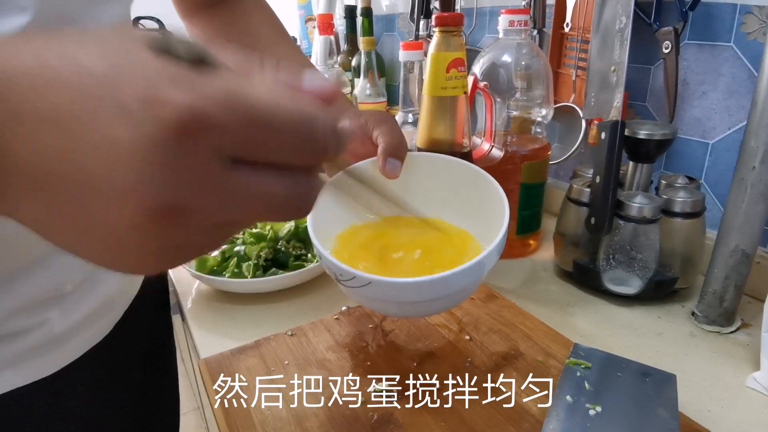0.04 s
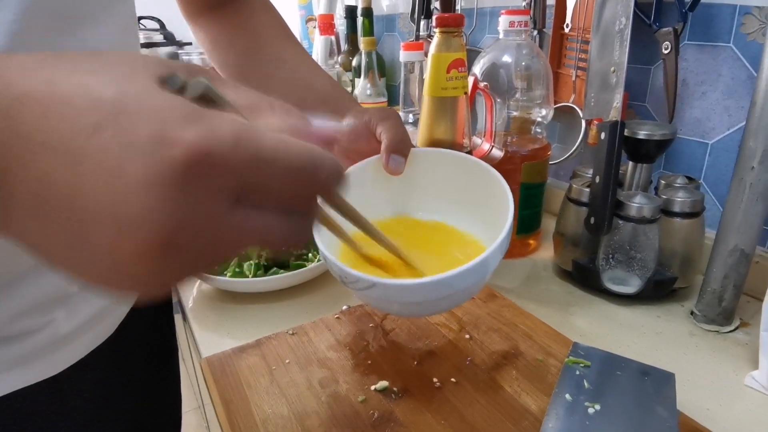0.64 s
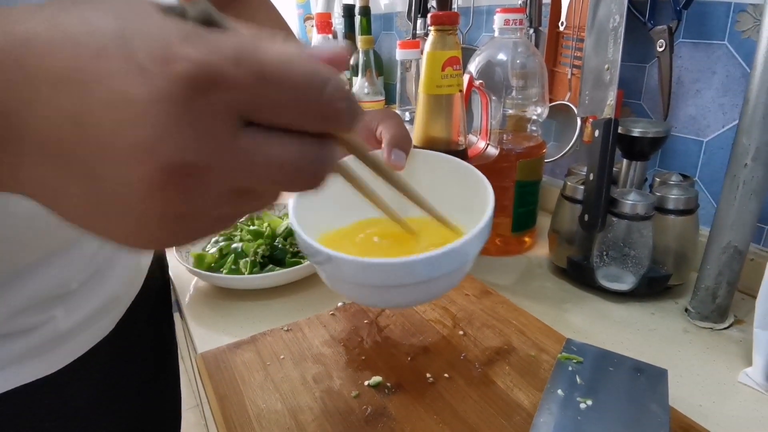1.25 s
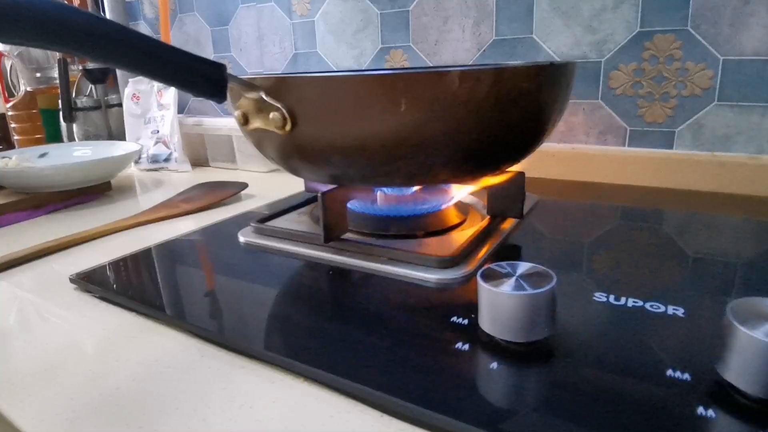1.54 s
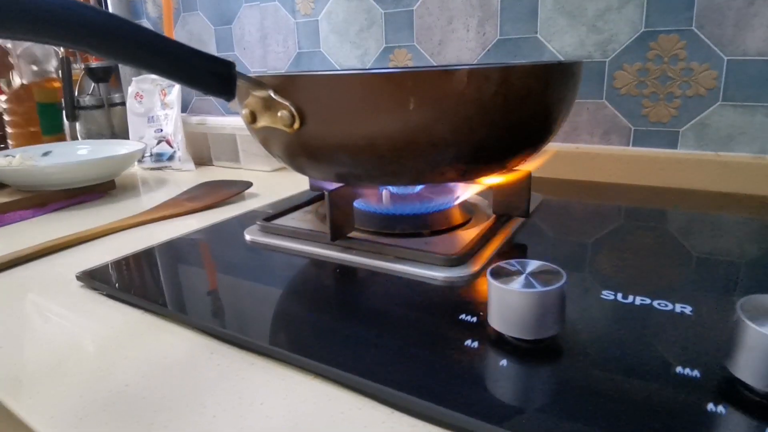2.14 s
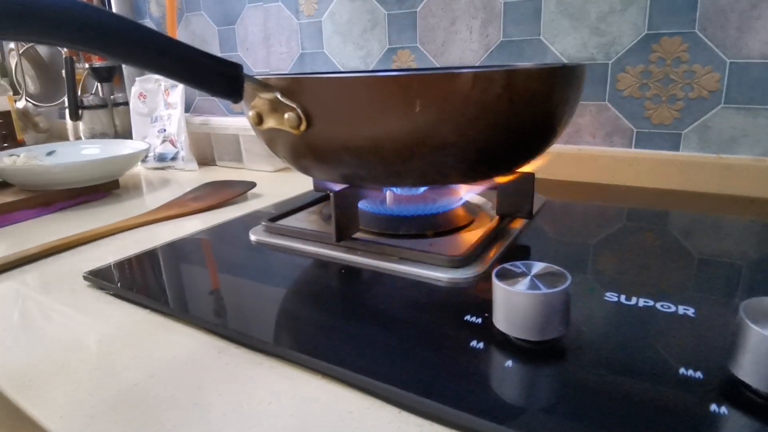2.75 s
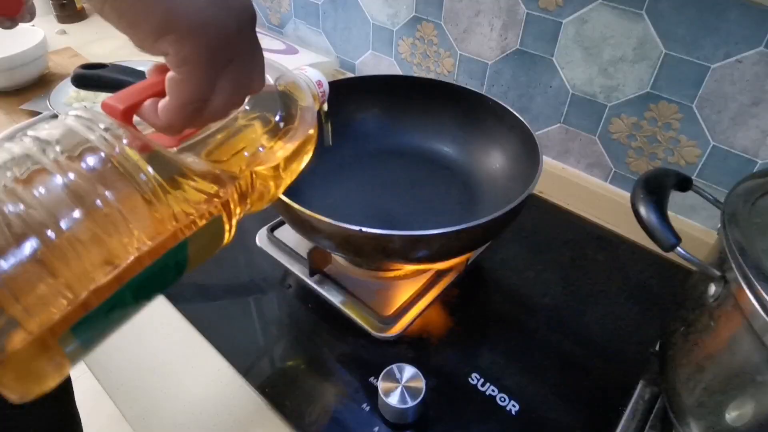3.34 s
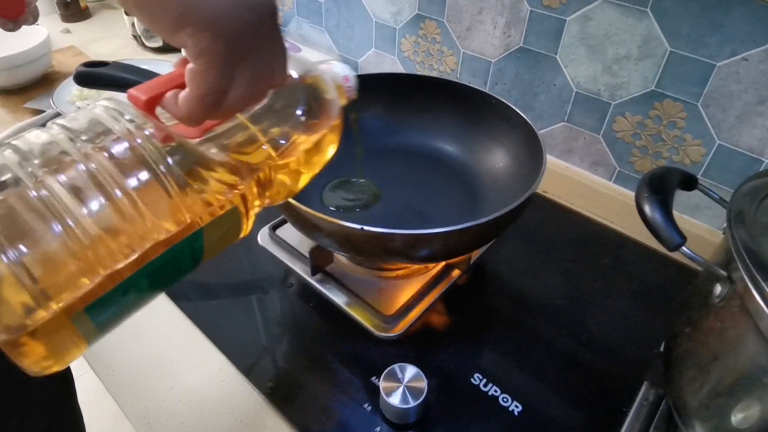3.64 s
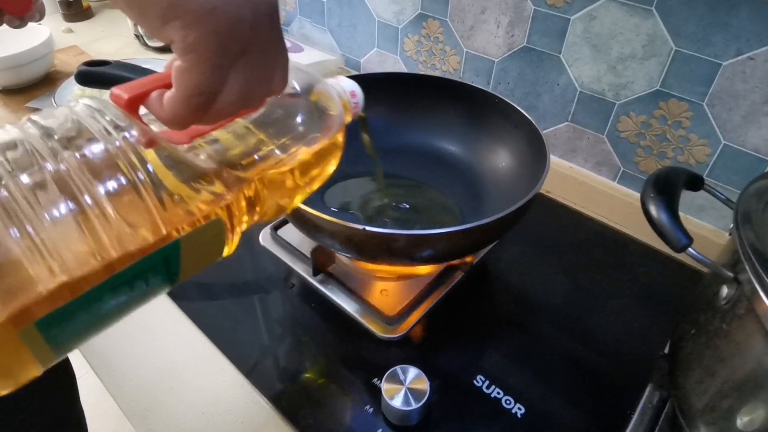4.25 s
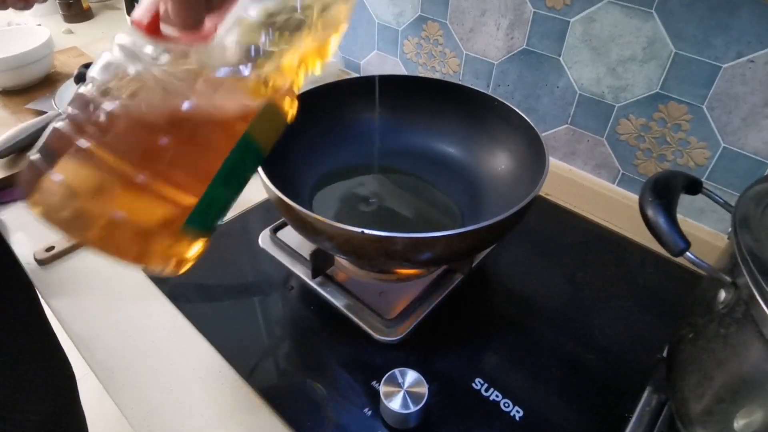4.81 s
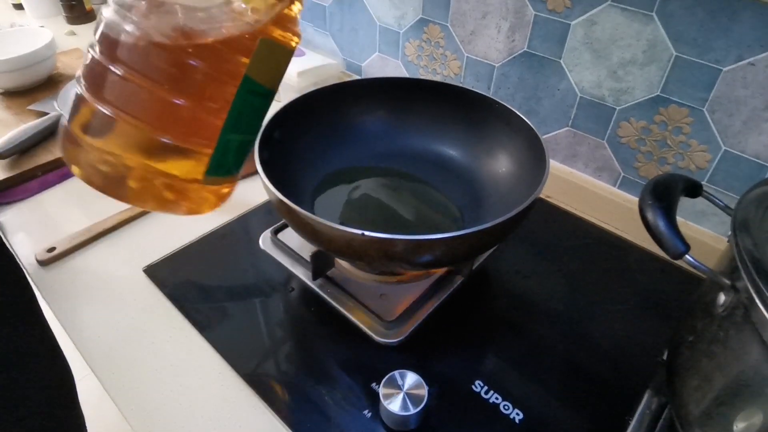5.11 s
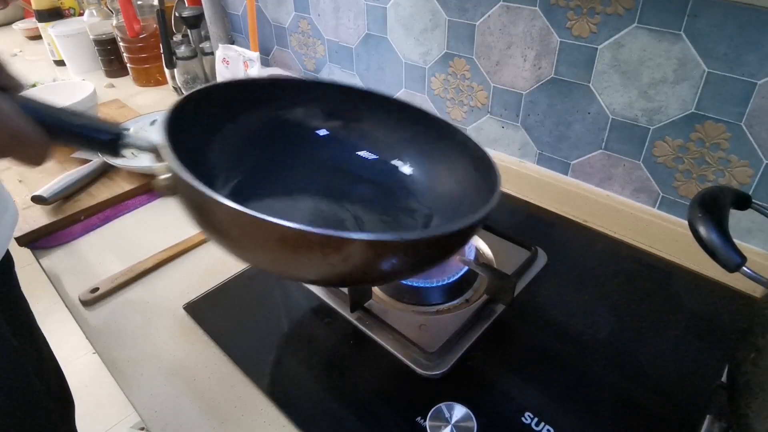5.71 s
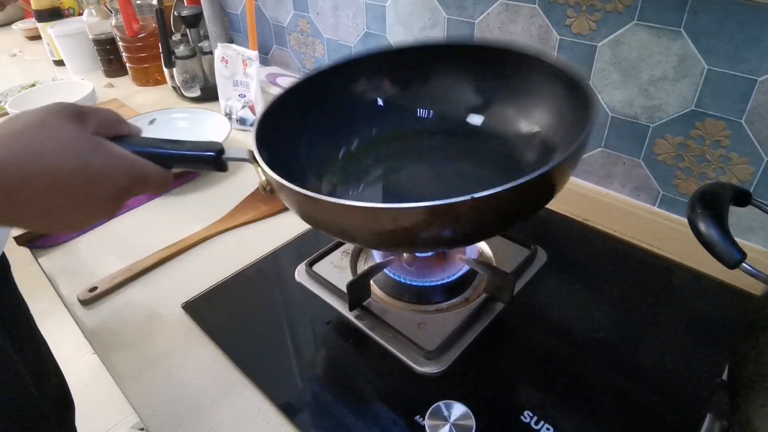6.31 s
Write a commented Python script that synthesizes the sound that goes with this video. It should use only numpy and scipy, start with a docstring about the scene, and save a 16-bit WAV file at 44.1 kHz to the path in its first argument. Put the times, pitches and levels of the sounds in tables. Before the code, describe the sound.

Rapid clacking and wet whisking in a bowl give way to a hissing gas flame, crackling plastic, small glugs and a light pan scrape.

```python
"""First, chopsticks beat raw eggs in a ceramic bowl in a small kitchen, six strokes a second:
wood clacks on the glaze, air pockets pop and the egg swishes. After a short silence a gas burner
hisses and rumbles under a wok. A plastic oil bottle crinkles as it is squeezed, with a soft, low
bump early on, and glugs near 5 s as air gulps back in. Last, the steel wok scrapes and rings
as it is lifted, and the uncovered flame hisses on."""
import sys
import numpy as np
from scipy import signal
from scipy.fft import rfft, irfft
from scipy.io import wavfile
from scipy.ndimage import uniform_filter1d

SR = 44100
rng = np.random.default_rng(int(sys.argv[2]) if len(sys.argv) > 2 else 0)


def generate_wav(signal):
    """Clip the signal to [-1, 1] and save it as 16-bit WAV at the path in sys.argv[1]."""
    frames = np.transpose(np.atleast_2d(signal))
    scaled = np.clip(frames, -1, 1) * 32767
    pcm = np.round(scaled).astype(np.int16)
    wavfile.write(sys.argv[1], SR, pcm)


N = 285327
TIME, FREQS = np.arange(N) / SR, np.fft.rfftfreq(N, 1 / SR)

# Table levels are relative. "Pan" is left minus right; "tilt" adds treble; "colour" is tone balance.
# sticks hit the bowl: (time [s], level [dB], main pitch [Hz], pan [dB], decay [s], tilt [dB/octave])
CLACKS = [(0.1467, -14.5, 2010, 0.5, 0.0021, 2.5), (0.3145, -16, 2760, -1, 0.0033, -2),
          (.4750, -16.5, 2980, 1, 0.002, 2.5), (0.6426, -17, 3000, -0.5, 0.003, 2),
          (0.8055, -25, 2720, 2.5, 0.0024, 7.5), (.9812, -14, 2130, 0.5, 0.002, 2),
          (1.1458, -29, 4600, -5, 0.0077, 15.5), (1.3221, -16.5, 2100, -0.5, 0.0017, -3.5),
          (1.3694, -20.5, 3450, -4.5, 0.0019, 5.5), (1.4641, -27.5, 2170, 1, 0.0013, -1.5),
          (1.4867, -20, 4650, -1, 0.0026, -23)]
# the dry knock of wood on glaze: (frequency [Hz], level [dB])
KNOCK_COLOUR = [(150, -41), (450, -31.5), (800, -9), (1300, -26.5), (2100, 4.5), (3000, 3), (3800, 2),
                (5200, 0), (6000, -8), (7000, -6), (9000, -22), (11000, -18), (16000, -52)]
# the bowl's notes, damped by fingers and egg: (pitch [Hz], level [dB], time to fade 60 dB [s])
BOWL_NOTES = [(861, -11.5, .26), (2035, -5.5, 0.179), (2180, -7, .22), (2440, -8.5, .25), (2600, -5, 0.2),
              (2870, -6.5, .28), (3050, -3, .22), (3400, -6, 0.21), (4170, -11.5, 0.19), (4980, -13, .2),
              (5170, -13, .22)]
# the dull knock of the bowl's belly: (frequency [Hz], level [dB])
BELLY_COLOUR = [(200, -29.5), (620, -17), (860, 0.5), (1100, -7), (1700, -10), (2600, -23.5), (8000, -60)]
# large air pockets open in the egg: (time [s], level [dB], pitch [Hz], decay [s], pan [dB])
POPS = [(.0545, -37.5, 8520, .003, 6), (0.1242, -32.5, 3850, .0015, 1), (.1278, -31, 1614, 0.0069, 0.5),
        (.1385, -25, 1948, 0.006, -4.5), (0.1484, -24, 2870, 0.0027, -0.5), (0.2949, -32, 4420, 0.0029, 0),
        (0.3156, -27.5, 2436, .0061, 5), (0.625, -39, 4420, .0051, 4), (.646, -32, 2796, 0.0073, 0),
        (.807, -41, 1087, .009, -2.5), (.8365, -35.5, 2904, 0.0049, 0), (0.9354, -26.5, 4360, 0.0013, 5),
        (.9825, -32.5, 2067, .0065, 5), (1.3023, -25, 2340, 0.0038, 3), (1.3213, -27, 2036, 0.0052, -3),
        (1.377, -48, 1022, .018, 0.5), (1.539, -45, 1200, 0.0088, 2)]
# the sticks sweep through the egg: (time of fastest sweep [s], level [dB], decay [s])
STROKES = [(0.0, -35.5, 0.048), (0.14, -47.5, 0.081), (0.499, -48, 0.033), (0.634, -47, 0.018),
           (0.822, -48, 0.045), (0.995, -59, .045), (1.165, -46, 0.037), (1.344, -52, 0.052),
           (1.5, -53, 0.093)]
# the egg's wet swish: (frequency [Hz], level [dB])
SWISH_COLOUR = [(200, -18.5), (500, -13), (1100, 8), (1600, 3), (2200, 10), (3000, 5), (5000, 4),
                (6000, -3.5), (8000, -2), (9000, -11.5), (11000, -11), (16000, -34)]
# the hand tightens on the bottle: (time [s], level [dB], decay [s], tilt [dB/octave])
SQUEEZES = [(1.904, -45, .028, 2), (2.01, -46, .014, 0), (2.071, -40.5, 0.022, 1.5),
            (2.32, -48.5, 0.028, 0.5), (2.904, -40.5, 0.025, 0), (3.06, -39, 0.024, 0.5),
            (3.181, -44.5, 0.015, 0), (3.562, -43.5, 0.02, -0.5), (3.608, -40, 0.013, 5.5),
            (3.763, -48.5, 0.027, -0.5), (4.08, -45.5, 0.011, 2.5), (4.355, -47, 0.058, 1.5),
            (4.619, -49.5, 0.023, -1), (4.686, -47, .022, 4.5), (5.276, -47.5, 0.038, 2)]
# the plastic wall buckles: (time [s], level [dB], decay [s], tilt [dB/octave])
SNAPS = [(1.995, -35, 0.007, 3.5), (2.117, -35, .005, 6), (2.142, -33.5, 0.0056, -1),
         (2.537, -36.5, 0.0046, -0.5), (2.5677, -31.5, 0.0042, 0.5), (2.5888, -29, 0.004, 1.5),
         (2.6393, -25.5, 0.0044, 3), (2.7276, -29, 0.0028, 6), (2.932, -28.5, 0.0077, -.5),
         (3.4464, -32.5, 0.0075, -1), (3.5382, -28, 0.0057, 2), (3.5991, -17, 0.0042, 4.5),
         (4.1256, -23, 0.0028, 4.5), (4.7842, -32.5, 0.0047, 7), (4.9242, -33, 0.0039, 3),
         (5.1414, -33.5, 0.0042, 2.5)]
# the crackle of thin plastic: (frequency [Hz], level [dB])
PLASTIC_COLOUR = [(150, -20), (500, -2.5), (1000, 5), (1500, 1), (2000, 3.5), (3200, -1), (4400, 4),
                  (5800, -1.5), (7500, -3), (9000, -6.5), (11000, -3.5), (13500, -12.5), (16000, -18)]
# pitches the bottle's shell favours: (pitch [Hz], width [Hz], boost [dB])
SHELL_PEAKS = [(1110, 85, 2), (1940, 64, 1.5), (2500, 430, 3), (4270, 200, -1.5), (5100, 150, 3.5),
               (7450, 290, 3)]
# air gulps into the bottle: (time [s], level [dB], pitch [Hz], decay [s], rise [octaves], pan [dB])
GLUGS = [(5.0174, -25, 2420, 0.00088, 0, -0.5), (5.0178, -42, 3000, 0.0042, 0.088, -2),
         (5.0175, -42.5, 794, 0.0061, 0.0084, 6.5), (5.092, -44.5, 1260, .012, 0.057, 7),
         (5.1765, -35, 737, 0.0084, 0.043, 1)]
# a soft, low bump: (time [s], level [dB], pitch [Hz], decay [s], rise [octaves], pan [dB])
BUMP = [(2.006, -51, 191, 0.0099, 0.12, 1), (2.008, -48.5, 268, 0.048, -0.079, -3),
        (2.01, -57, 545, 0.031, 0.021, 0), (2.085, -50.5, 199, 0.013, -0.86, -3)]
# the steel wok's notes: (pitch [Hz], level [dB], time to fade 60 dB [s])
WOK_NOTES = [(1832, 0, 0.29), (2180, -5, .18), (2720, -4, 0.16), (3650, -14, 0.16), (4800, -20, .22)]
# the flame under the wok: (frequency [Hz], level [dB])
COVERED_FLAME = [(12, -36), (20, -7.5), (48, 2), (62, -3), (85, -4), (130, -2), (357, -16), (434, -8),
                 (513, -18.5), (660, -10), (802, -11), (949, -9.5), (5850, -22.5), (6540, -2),
                 (7310, -28.5), (16000, -47)]
# the flame with the wok lifted: (frequency [Hz], level [dB])
OPEN_FLAME = [(12, -29), (20, -3.5), (49, -4.5), (150, -10.5), (388, -18), (1150, -17.5), (1260, -22.5),
              (1810, -16), (2020, -24), (2530, -27), (3950, -26), (6540, -20.5), (8650, -38),
              (13200, -36.5), (16000, -67)]
# hums and whistles of burner and wok: (pitch [Hz], width [Hz], level covered [dB], level open [dB])
JET_PEAKS = [(52, 5, -76, -63.5), (131.6, 7.8, -66.5, -74), (1840, 28, -86, -72.5), (2523, 130, -86, -71),
             (6516, 93, -75, -64), (6690, 300, -71.5, -64), (12470, 1600, -77, -74)]
# the whistle swells for a moment: (time [s], boost [dB])
WHISTLE_SWELLS = [(5.595, 0), (6.25, 8.5)]
# the flame rumbles more once the air is stirred: (time [s], level [dB])
RUMBLE_LEVEL = [(1.9, -66.5), (3.5, -67), (3.8, -59.5), (4.0, -54.5), (4.25, -57.5), (5.3, -57.5),
                (6.47, -60)]
# the deep tone of that rumble: (frequency [Hz], level [dB])
RUMBLE_COLOUR = [(20, -11.5), (48, 4), (62, -12), (85, -3.5), (130, 0.5), (200, -8), (400, -11),
                 (1000, -67)]
# the kitchen's steady background: (frequency [Hz], level [dB])
KITCHEN_COLOUR = [(20, -3.5), (50, -0.5), (62, -4.5), (85, 3.5), (110, -4), (128, 8), (160, -8.5),
                  (230, -12.5), (350, -11), (500, -17.5), (900, -18.5), (2000, -37.5), (8000, -36),
                  (16000, -56)]
# the echo from the walls: (frequency [Hz], time to fade 60 dB [s])
ECHO_TIMES = [(200, 0.49), (1300, 0.2), (3500, 0.38), (9000, 0.36), (16000, 0.18)]
# how alike left and right are for sound from all around: (frequency [Hz], likeness [0 to 1])
LIKENESS = [(60, 0.85), (300, 0.82), (700, 0.66), (1400, 0.067), (3000, 0), (16000, 0.0012)]
# the side each frequency leans to: (frequency [Hz], pan [dB])
SIDE_COLOUR = [(60, 4.5), (200, 1), (400, 0), (2000, 0.5), (3000, 0), (4500, -3.5), (6500, -6),
               (8300, -10.5), (9500, 11.5), (11500, 6), (13000, 4.5), (15500, 4.5)]
# a silence, then two brief dips in level:
# (fade-out end [s], fade-out length [s], fade-in start [s], fade-in length [s], lowest gain [0 to 1])
DIPS = [(1.612, .062, 1.8995, .0025, 0), (3.497, .042, 3.512, .038, .06), (5.396, .046, 5.424, .046, .025)]


def chopsticks(first_db=-7, second_db=-12, gap_s=.003, ring_db=-27, hollow_db=6, hollow_octaves=.27):
    """One stick hits the glaze just after the other; the hollow bowl colours the knock and rings."""
    out = np.zeros((2, N))
    for start, db, peak_hz, pan_db, decay, tilt_db in CLACKS:
        def tone(hz):
            octaves = np.log2((hz + 1) / peak_hz)
            egg_db = ripple(hz, depth_db=2, width_hz=300)
            boost_db = hollow_db * np.exp(-(octaves / hollow_octaves) ** 2)
            return read(KNOCK_COLOUR, hz) + egg_db + boost_db + tilt_db * np.maximum(octaves, 0)
        for delay, stick_db in (0, first_db), (gap_s * (.5 + rng.random()), second_db):
            contact = nearby(rng.standard_normal((2, 4096)), shared=.27)
            knock = burst(contact, decay, rise_s=.00074, tone=tone)
            add(out, start + delay, amp(db + stick_db) * knock, pan_db)
        # the moving egg shifts the bowl's notes a little at every hit
        shifts = np.exp(.012 * rng.standard_normal(len(BOWL_NOTES)))
        notes = [(hz * shift, level, fade) for (hz, level, fade), shift in zip(BOWL_NOTES, shifts)]
        add(out, start, amp(db + ring_db) * ring(notes), pan_db)
    return out


def bowl_belly(level_db=-43, decay_s=.0033):
    """Each hit also pushes the filled bowl, which gives a short, low knock of even strength."""
    out = np.zeros((2, N))
    for start, _, _, pan_db, _, _ in CLACKS:
        push = nearby(rng.standard_normal((2, 4096)), shared=.73)
        knock = burst(push, decay_s, rise_s=.0013, tone=lambda hz: read(BELLY_COLOUR, hz))
        add(out, start, amp(level_db) * knock, pan_db)
    return out


def air_pockets(small_db=-49, scatter_s=.045, low_hz=1150, high_hz=4300, cycles=12, rise_octaves=.14):
    """Large pockets pop one by one; each stroke also frees two small ones, which ring longer if low."""
    pops = [(start, db, hz, decay, rise_octaves, pan_db) for start, db, hz, decay, pan_db in POPS]
    for start, _, _ in STROKES:
        for _ in range(2):
            offset = rng.uniform(-scatter_s, scatter_s)
            hz = low_hz * (high_hz / low_hz) ** rng.random()
            pops.append((start + offset, small_db, hz, cycles / hz, rise_octaves, 0))
    return blips(pops, roughness=.29)


def egg_swish(level_db=-2, patchy_db=4, stirring_db=-68, rise_s=.026):
    """Films of egg tear into a fine, wet crackle, coloured by hollows that open and close."""
    crackle = nearby(grains(7000, spread_db=2.6, size=N), shared=.6)
    _, _, bands = signal.stft(crackle, SR, nperseg=512, noverlap=384)
    hollows = uniform_filter1d(rng.standard_normal(bands.shape[1:]), size=4, axis=0)  # smooth in pitch
    hollows = unit(uniform_filter1d(hollows, size=6, axis=1))  # and in time
    wet = signal.istft(bands * amp(patchy_db * hollows), SR, nperseg=512, noverlap=384)[1][:, :N]
    sweep = amp(stirring_db) + sum(amp(db) * swell(peak, rise_s, decay) for peak, db, decay in STROKES)
    return amp(level_db) * sweep * colour(unit(wet), lambda hz: read(SWISH_COLOUR, hz))


def bottle(snap_db=-8, rustle_db=-1.5, squeeze_rise_s=.0063):
    """Thin plastic crackles under each squeeze, and now and then buckles with one sharp snap."""
    out = np.zeros((2, N))
    crackle = grains(6000, spread_db=2.4, size=N)
    for peak, db, decay, tilt_db in SQUEEZES:
        rustle = crackle * swell(peak, squeeze_rise_s, decay)
        out += amp(db + rustle_db) * colour(rustle, lambda hz: bottle_wall(hz, tilt_db))
    for start, db, decay, tilt_db in SNAPS:
        buckle = grains(6000, spread_db=2.6, size=4096)
        snap = burst(buckle, decay, rise_s=.00034, tone=lambda hz: bottle_wall(hz, tilt_db))
        add(out, start, amp(db + snap_db) * snap)
    return out


def bottle_wall(hz, tilt_db):
    """The colour of one patch of wall, in dB: plastic, the shell's peaks and some chance ripple."""
    shell_db = sum(boost_db * hump(hz, pitch, width) for pitch, width, boost_db in SHELL_PEAKS)
    return plastic(hz, tilt_db) + shell_db + ripple(hz, depth_db=2.5, width_hz=260)


def plastic(hz, tilt_db):
    """The colour of thin plastic, in dB, tilted brighter or duller."""
    return read(PLASTIC_COLOUR, hz) + tilt_db * np.log2(np.maximum(hz, 500) / 4000)


def creases(per_s=22, level_db=-57, spread_db=3, start_s=1.9, stop_s=5.35):
    """The gripped bottle keeps ticking faintly between the larger crinkles."""
    out, span = np.zeros((2, N)), stop_s - start_s
    for when, softness, length in rng.random((int(per_s * span), 3)):
        gain = amp(level_db - spread_db * np.log(.05 + softness))
        crackle = grains(4000, spread_db=1.5, size=2048)
        decay = .00048 + .0041 * length
        tick = burst(crackle, decay, rise_s=.00056, tone=lambda hz: plastic(hz, tilt_db=2.5))
        add(out, start_s + when * span, gain * tick)
    return out


def glugs():
    """Air gulps back into the bottle and its wall pops."""
    return blips(GLUGS, roughness=.37)


def bump():
    """A few low, rough notes blur into a soft bump."""
    return blips(BUMP, roughness=.74)


def wok(start_s=5.4675, ring_db=-40, scrape_db=-49, scrape_decay_s=.053):
    """The steel pan scrapes off its stand and rings, its pitch sagging a little as it tilts."""
    def steel(hz):
        power = sum(10 ** (db / 10) * hump(hz, pitch, width_hz=180) for pitch, db, _ in WOK_NOTES)
        return 10 * np.log10(power)
    out = np.zeros((2, N))
    add(out, start_s, amp(ring_db) * ring(WOK_NOTES, sag=.0447))
    scrape = burst(grains(4000, spread_db=1.7, size=11000), scrape_decay_s, rise_s=.003, tone=steel)
    add(out, start_s - .02, amp(scrape_db) * scrape)
    return out


def burner(flame_db=-56, fizz_db=-63, lift_s=5.41, swell_s=.031, whistle_above_hz=6000):
    """Gas rushes through the jet with a wavering whistle; the flame rumbles, and fizzes while covered."""
    lifted = TIME > lift_s
    fizz_gain = amp(fizz_db) * waver(depth_db=1.5, per_s=18)
    fizz = colour(grains(3000, spread_db=.92, size=N), lambda hz: read(PLASTIC_COLOUR, hz))
    covered = amp(flame_db) * noise(amp(read(COVERED_FLAME, FREQS))) + fizz_gain * fizz
    uncovered = amp(flame_db) * noise(amp(read(OPEN_FLAME, FREQS)))
    out = np.where(lifted, uncovered, covered)
    swell_db = sum(db * swell(peak, swell_s, swell_s) for peak, db in WHISTLE_SWELLS)
    whistle = waver(depth_db=2.5, per_s=12) * amp(swell_db)
    for hz, width, covered_db, open_db in JET_PEAKS:
        gain = amp(np.where(lifted, open_db, covered_db)) * (whistle if hz > whistle_above_hz else 1)
        out += gain * noise(hump(FREQS, hz, width))
    rumble_db = np.interp(TIME, *np.transpose(RUMBLE_LEVEL))
    return out + amp(rumble_db) * noise(amp(read(RUMBLE_COLOUR, FREQS)))


def kitchen_hum(level_db=-52.5):
    """The kitchen's faint, steady, low noise."""
    return amp(level_db) * noise(amp(read(KITCHEN_COLOUR, FREQS)))


def room(sound, echo_db, build_s=.0019, patterns=3):
    """Close walls add dense echoes that die band by band; patterns alternate so no pitch rings steadily."""
    out = sound.copy()
    for k in range(patterns):
        echoes = rng.standard_normal((2, SR // 2)) * (rng.random((2, SR // 2)) < .15)
        hz, t, bands = signal.stft(echoes, SR, nperseg=256)
        bands = blend_sides(bands, read(LIKENESS, hz)[:, None])
        fade = amp(-60 * t / read(ECHO_TIMES, hz)[:, None])
        tail = signal.istft(bands * fade, SR, nperseg=256)[1]
        tail *= 1 - np.exp(-(np.arange(tail.shape[1]) / SR / build_s) ** 2)
        tail /= np.linalg.norm(tail[0])
        share = np.sqrt(2 / patterns) * np.cos(2 * np.pi * (TIME + k / patterns))  # one cycle a second
        out += amp(echo_db) * signal.oaconvolve(sound * share, tail, axes=1)[:, :N]
    return out


def blips(rows, roughness, splash_db=-12, wobble_cycles=3, left_lag_s=.00002, glide_s=.011, size=11000):
    """Short notes that glide and wobble like a ringing air pocket, each with a splash of noise."""
    out, t = np.zeros((2, N)), np.arange(size) / SR
    for start, db, hz, decay, rise, pan_db in rows:
        turns = np.cumsum(hz * 2 ** (rise * (1 - np.exp(-t / glide_s)))) / SR
        phase = 2 * np.pi * (turns - hz * np.array([[left_lag_s], [0]]))
        shape = (1 - np.exp(-t / (.18 * decay))) * np.exp(-t / decay)
        # the wobble roughens the note but leaves its energy alone
        wobble = unit(uniform_filter1d(rng.standard_normal((2, 2, size)), int(wobble_cycles * SR / hz)))
        swing = shape * (1 + roughness * (wobble[0] + 1j * wobble[1]))
        swing *= np.linalg.norm(shape / shape.max()) / np.linalg.norm(swing, axis=1, keepdims=True)
        note = (swing * np.exp(1j * phase)).imag
        around_note = lambda f: -17 * np.minimum(abs(np.log2((f + 1) / hz)), 4)  # 17 dB less per octave
        splash = burst(grains(9050, spread_db=3.2, size=size), decay, rise_s=.00029, tone=around_note)
        add(out, start, amp(db) * (note + amp(splash_db) * splash), pan_db)
    return out


def ring(notes, sag=0., sag_s=.0465, size=22000):
    """Dying notes, which start too high by the fraction sag and then settle."""
    t = np.arange(size) / SR
    bent_time = t + sag * sag_s * (1 - np.exp(-t / sag_s))
    ringing = sum(amp(db - 60 * t / fade_s) * np.sin(2 * np.pi * (hz * bent_time + rng.random((2, 1)) / 3))
                  for hz, db, fade_s in notes)
    return ringing * (1 - np.exp(-t / .00038))


def burst(source, decay_s, rise_s, tone):
    """A coloured burst that swells and dies; a longer one carries more energy."""
    t = np.arange(source.shape[1]) / SR
    shape = (1 - np.exp(-(t / rise_s) ** 2)) * np.exp(-np.maximum(t - rise_s, 0) / decay_s)
    sound = colour(source * shape, tone)
    return sound * np.linalg.norm(shape) / np.linalg.norm(sound, axis=1, keepdims=True)


def grains(per_s, spread_db, size):
    """Tiny clicks of very unequal strength, which reach each side differently."""
    clicks = rng.random(size) < per_s / SR
    strength = amp(spread_db * np.minimum(rng.exponential(1, size), 4))
    return unit(clicks * strength * rng.standard_normal((2, size)))


def noise(gains):
    """Stereo noise with one gain per frequency, alike on both sides in the bass."""
    spectrum = blend_sides(rfft(rng.standard_normal((2, N))), read(LIKENESS, FREQS))
    return unit(irfft(spectrum * gains, N))


def blend_sides(sides, likeness):
    """Makes the right side partly a copy of the left."""
    left, right = sides
    return np.array([left, likeness * left + np.sqrt(1 - likeness ** 2) * right])


def nearby(sides, shared):
    """Part of a near sound reaches both sides, the left two samples early."""
    left, right = sides
    return np.array([np.roll(shared * right, -2) + np.sqrt(1 - shared ** 2) * left, right])


def colour(sound, tone):
    """Filters a sound to the shape tone(hz), in dB, with no ringing ahead of it."""
    log_gain = np.log(amp(tone(abs(np.fft.fftfreq(2048, 1 / SR)))))
    taps = np.fft.ifft(np.exp(np.conj(signal.hilbert(log_gain)))).real
    return signal.oaconvolve(sound, taps[None] / np.linalg.norm(taps), axes=1)[:, :sound.shape[1]]


def hump(hz, centre_hz, width_hz):
    """A rounded peak of height 1 around one pitch."""
    return 1 / (1 + (2 * (hz - centre_hz) / width_hz) ** 2)


def ripple(hz, depth_db, width_hz):
    """Chance peaks and dips, different for every point of contact."""
    return depth_db * np.interp(hz, np.arange(400) * width_hz, rng.standard_normal(400))


def swell(peak_s, rise_s, decay_s):
    """A gain that grows until peak_s and dies away after it."""
    distance = np.where(TIME < peak_s, (peak_s - TIME) / rise_s, (TIME - peak_s) / decay_s)
    return np.exp(-np.minimum(distance, 30))


def waver(depth_db, per_s):
    """A gain that wanders at random."""
    return amp(depth_db * np.interp(TIME * per_s, np.arange(400), rng.standard_normal(400)))


def add(mix, start_s, sound, pan_db=0):
    """Mixes a sound in at a time and a side."""
    part = mix[:, max(round(start_s * SR), 0):][:, :sound.shape[-1]]
    part += (sound * amp([[pan_db / 2], [-pan_db / 2]]))[:, :part.shape[1]]


def read(table, hz):
    """Reads between a table's rows, with octaves evenly spaced."""
    freqs, values = np.transpose(table)
    return np.interp(np.log(hz + 1), np.log(freqs + 1), values)


def amp(db):
    """Turns decibels into a gain."""
    return 10 ** (np.asarray(db) / 20)


def unit(x):
    """Scales to an average power of 1."""
    return x / np.sqrt(np.mean(x ** 2) + 1e-20)


def scene(switch_s=1.75):
    """First the eggs, then the stove."""
    eggs = room(chopsticks() + bowl_belly() + air_pockets() + egg_swish(), echo_db=-6) + kitchen_hum()
    handling = glugs() + bump() + wok()
    stove = room(bottle() + creases() + handling, echo_db=-4) + burner()
    return np.where(TIME < switch_s, eggs, stove)


def record(dry, top_hz=16350):
    """Colours each side, fades to a short silence, dips the level twice and cuts the highest treble."""
    side_gains = amp(read(SIDE_COLOUR, FREQS) * np.array([[.5], [-.5]]))
    sound = irfft(rfft(dry) * side_gains, N)
    for end, out_s, start, in_s, lowest in DIPS:
        fade = np.maximum((end - TIME) / out_s, (TIME - start) / in_s)
        sound *= np.clip(fade, lowest, 1)
    treble_cut = signal.firwin(511, top_hz, window=("kaiser", 9), fs=SR)
    return signal.oaconvolve(sound, treble_cut[None], "same")


dry = scene()
out = record(dry)
generate_wav(out)
```